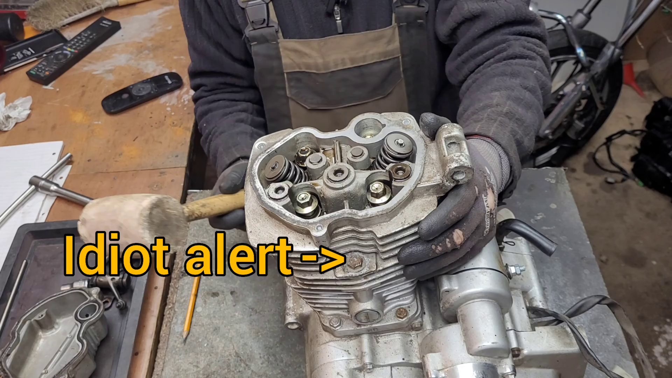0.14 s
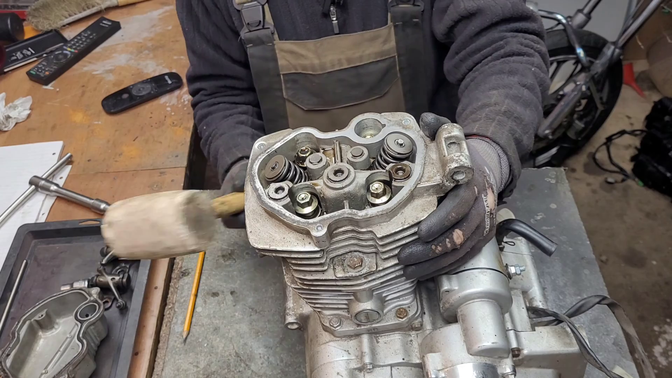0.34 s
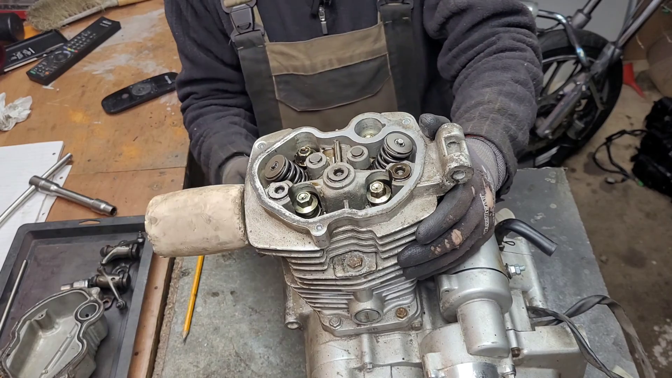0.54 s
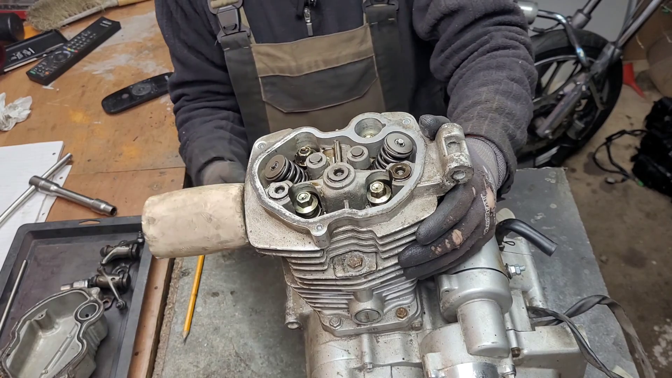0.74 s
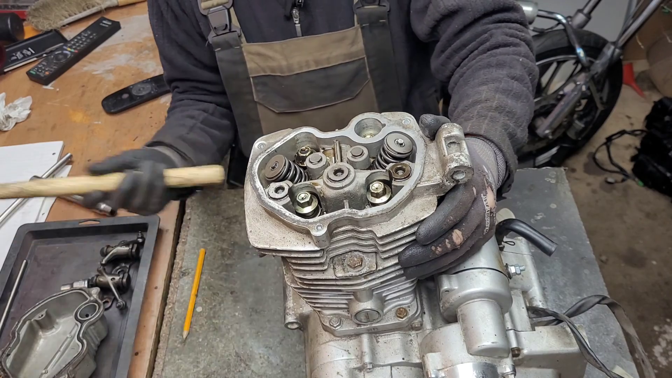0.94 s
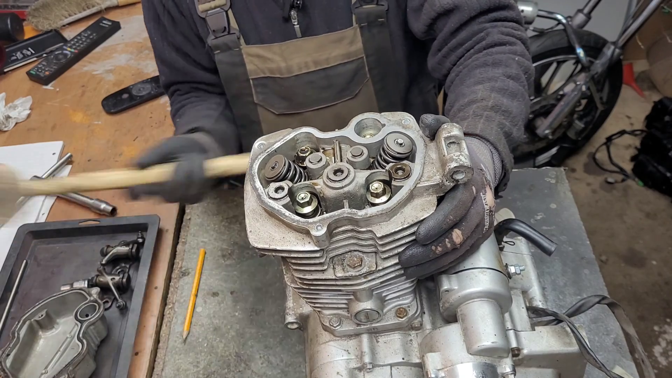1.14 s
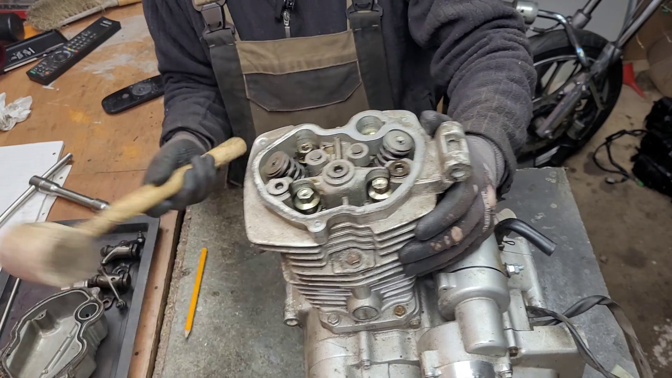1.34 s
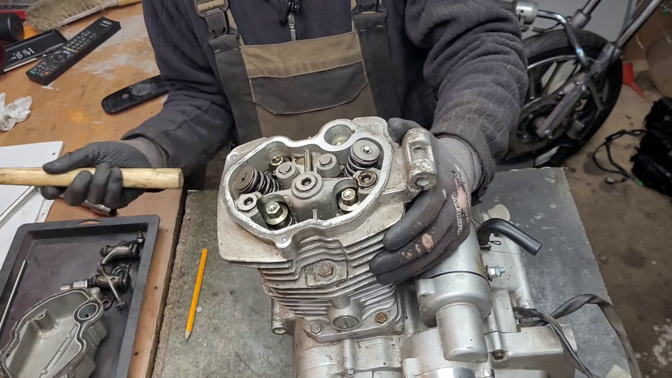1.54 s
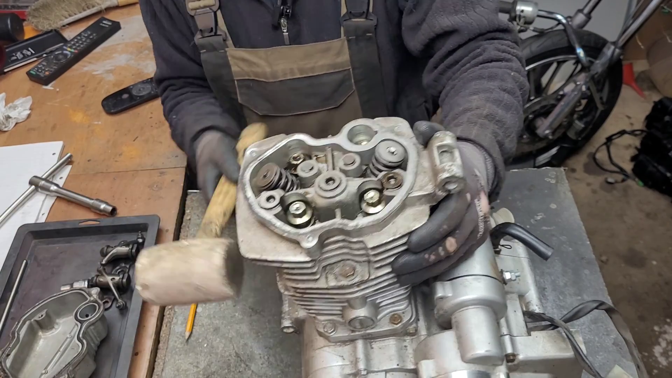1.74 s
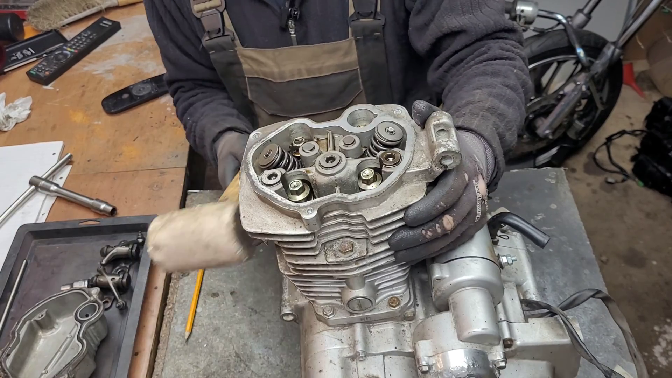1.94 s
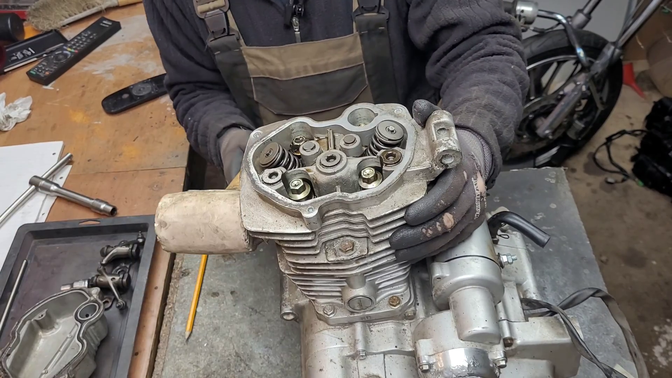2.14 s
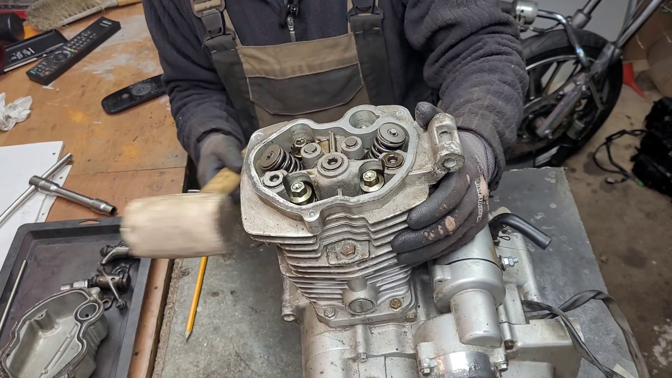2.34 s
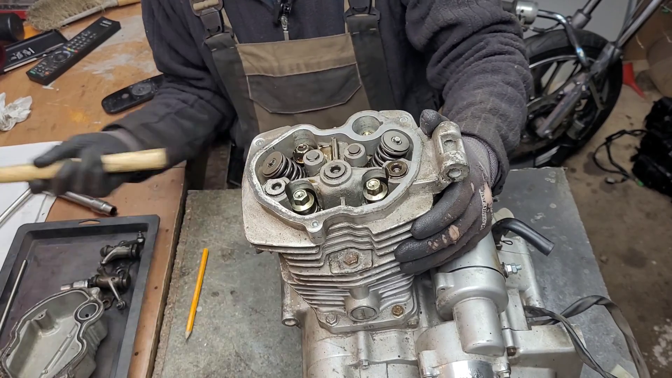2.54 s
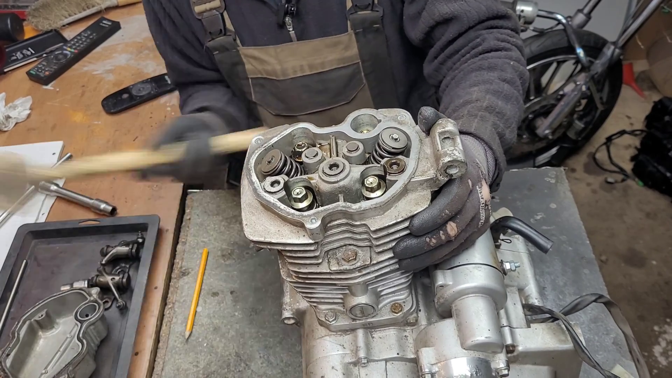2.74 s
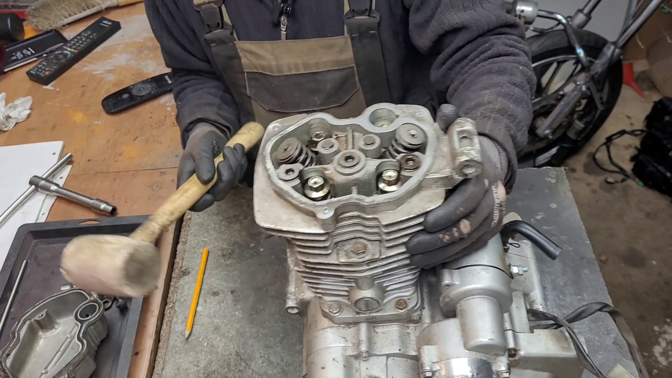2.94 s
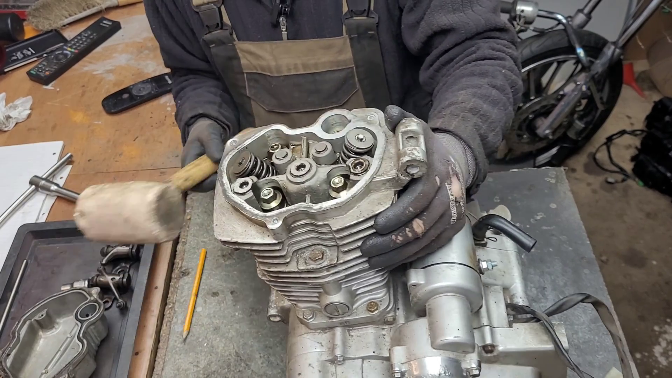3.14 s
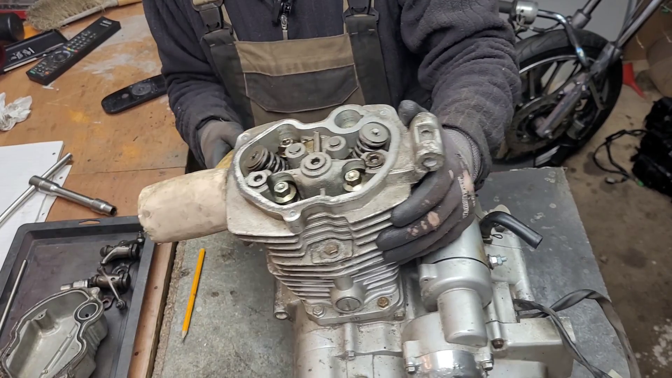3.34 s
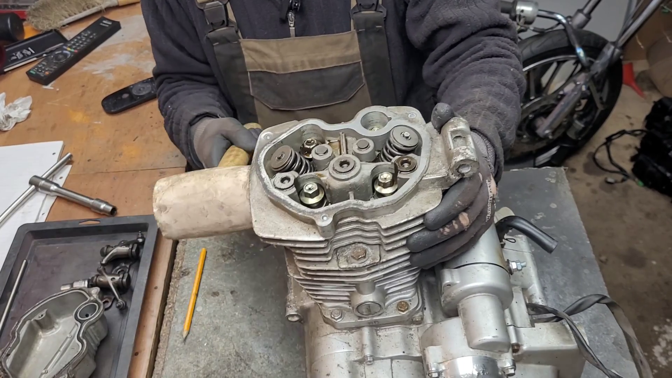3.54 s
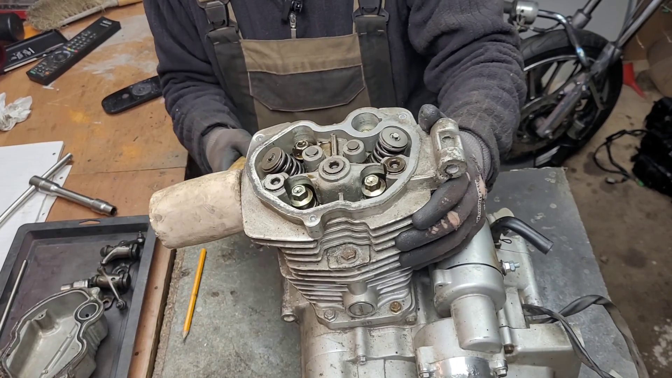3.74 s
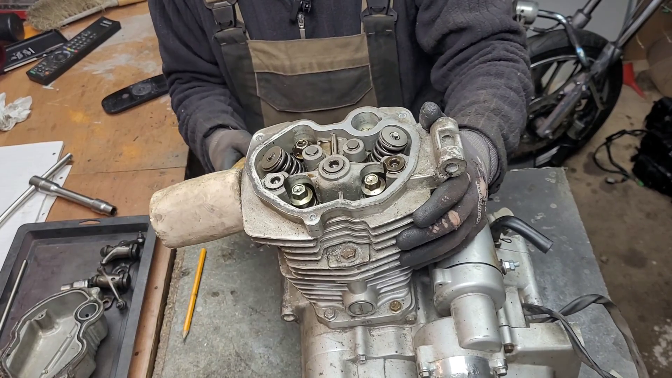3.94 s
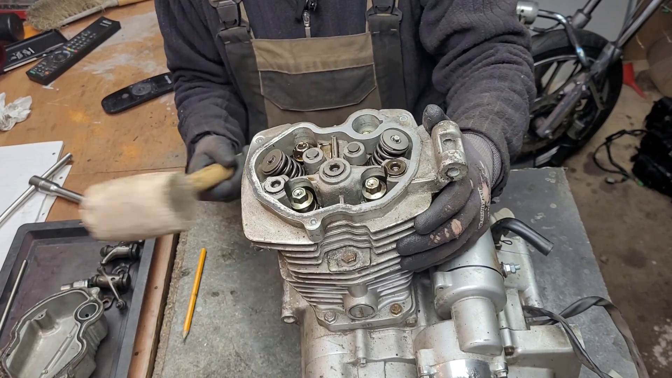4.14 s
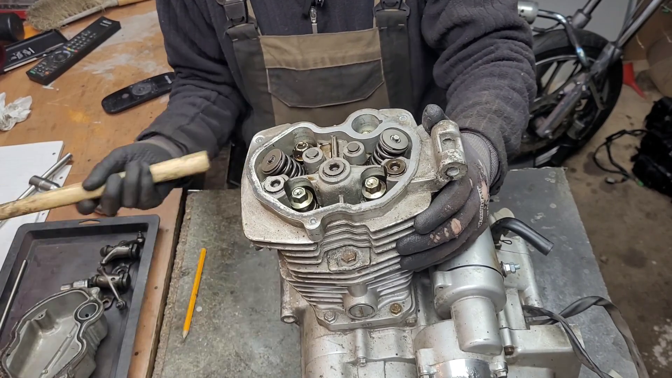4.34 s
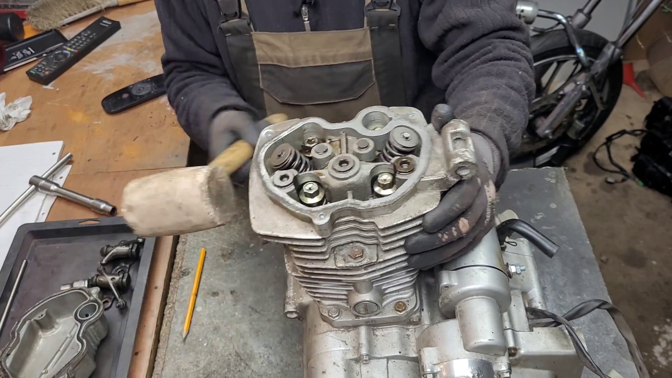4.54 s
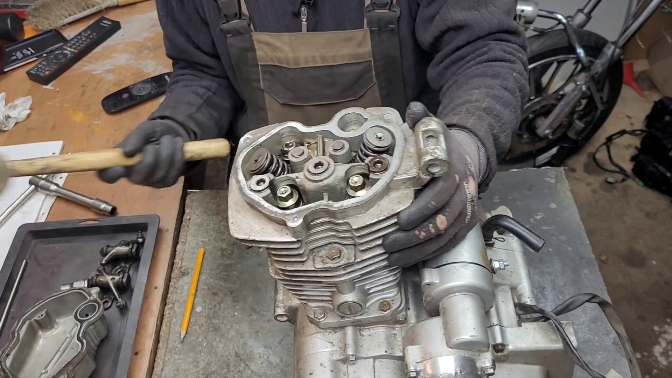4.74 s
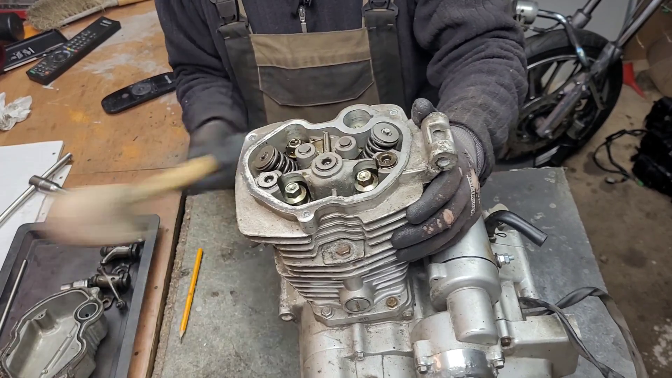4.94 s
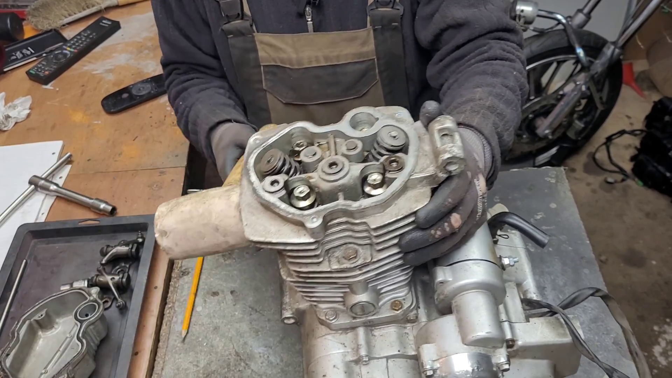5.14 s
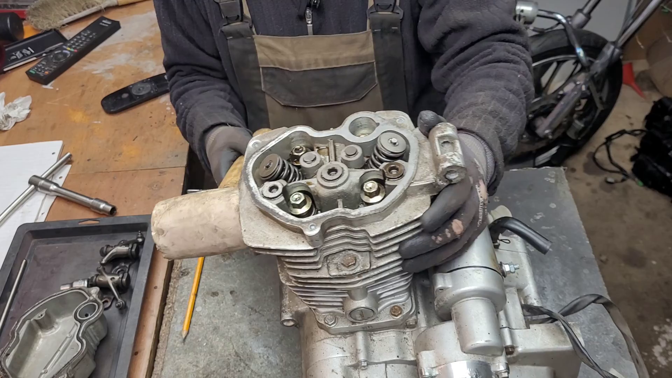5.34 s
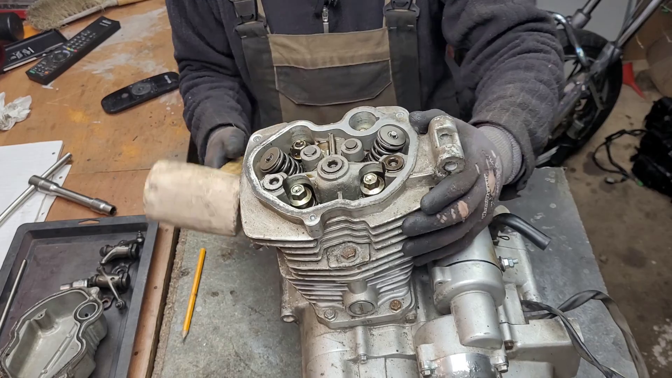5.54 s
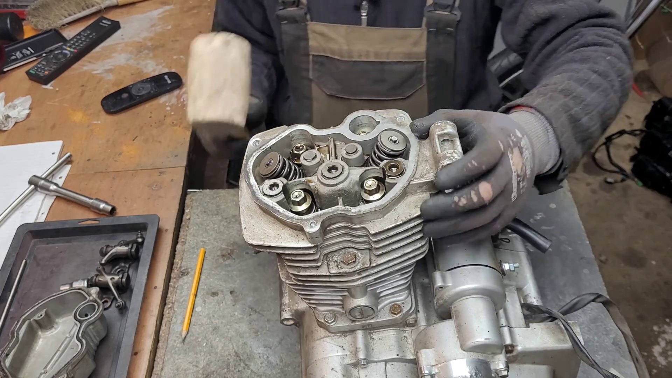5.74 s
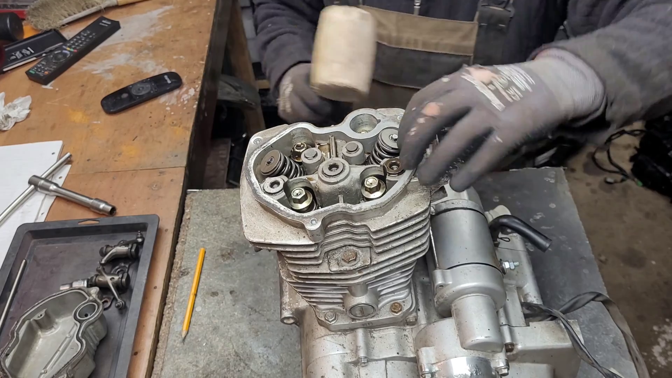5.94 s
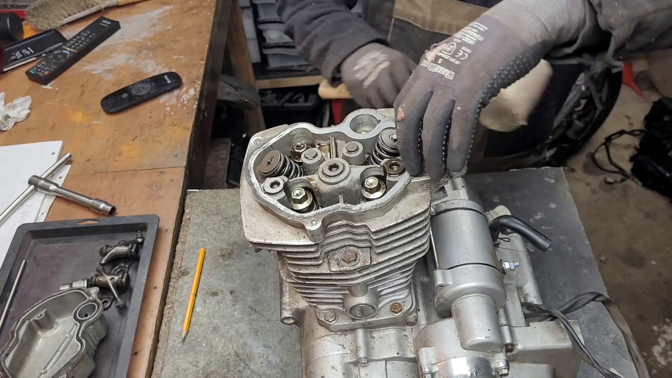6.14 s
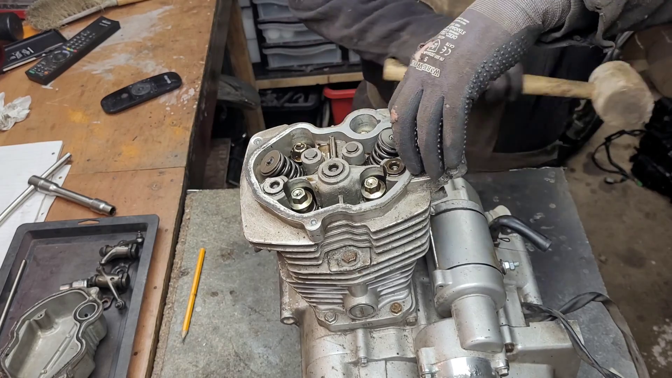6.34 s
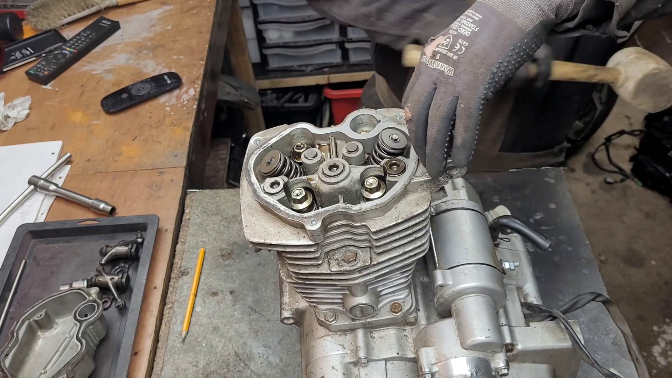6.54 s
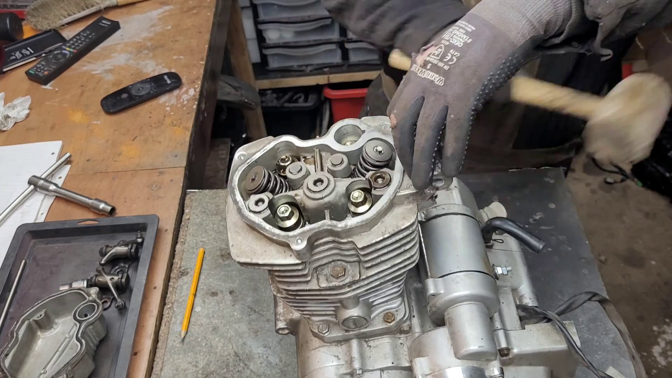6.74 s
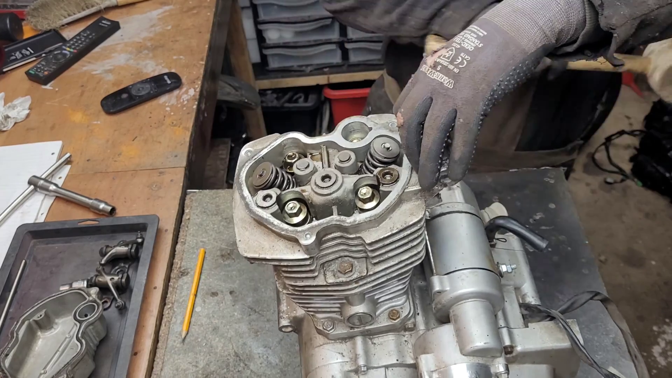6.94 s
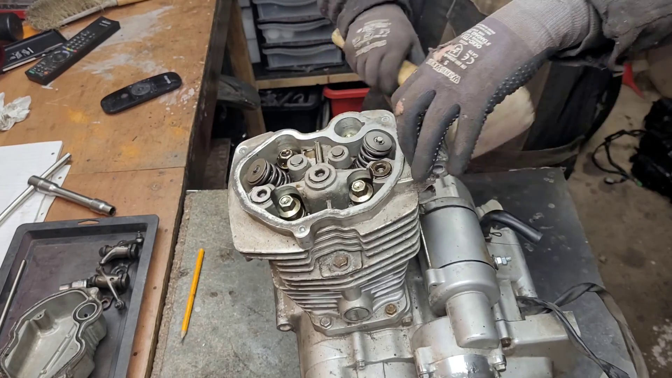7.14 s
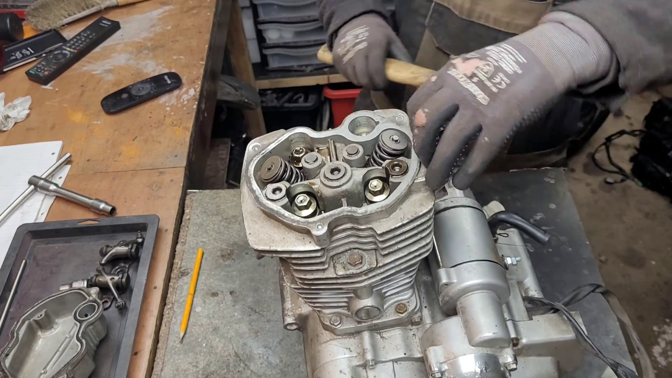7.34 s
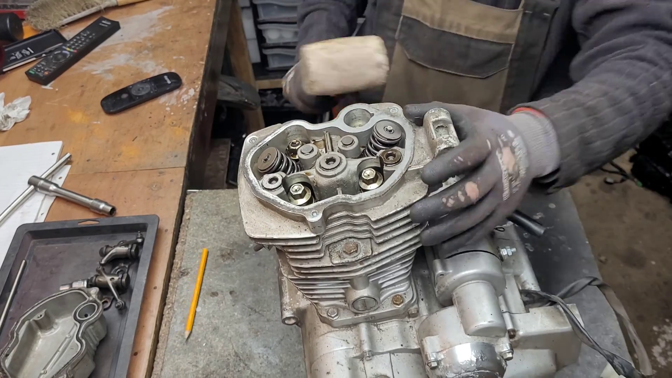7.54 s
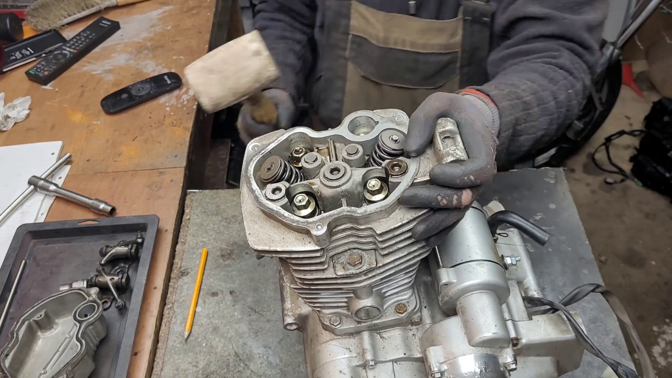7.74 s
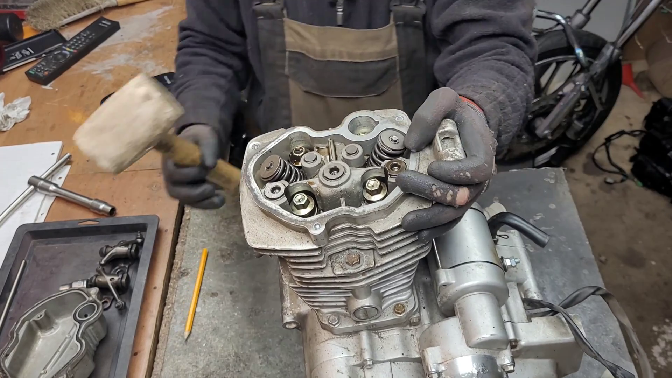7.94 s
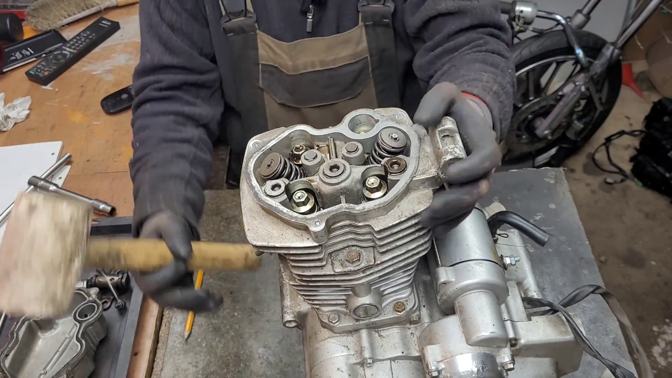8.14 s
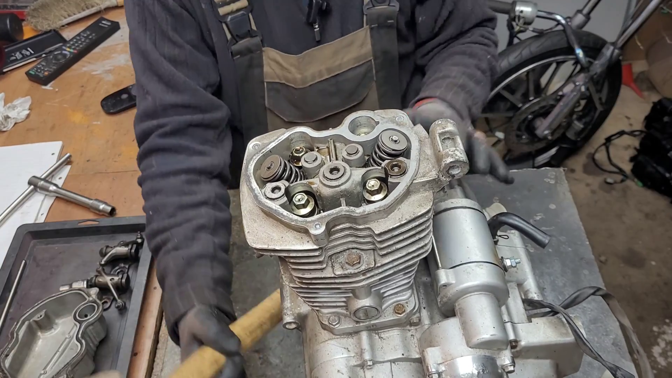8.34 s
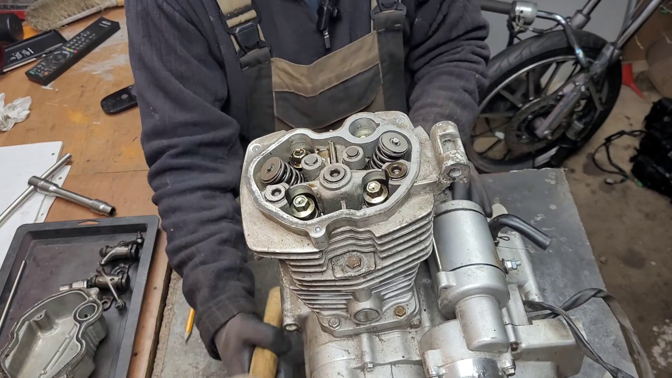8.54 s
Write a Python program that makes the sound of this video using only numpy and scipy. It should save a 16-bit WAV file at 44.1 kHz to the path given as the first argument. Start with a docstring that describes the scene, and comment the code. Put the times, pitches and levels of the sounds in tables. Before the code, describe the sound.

Near-centred close microphone, short room tail, faint still air and hum. Seven solid mallet hits on a small engine, unevenly spaced, with quick steel rattles and brief damped ringing. Light taps, clacks, tiny clinks and wooden bench knocks fill the gaps. After the fifth hit, fabric and gloves rustle; two deep hits with sharp snaps come late, then only scraping sleeves, hissing gloves and small bumps remain.

```python
"""A mallet knocks the aluminium cylinder head of a small engine loose, on a bench in a small workshop.
Each blow is a noise crack, a swelling sine thud and damped modes of the casting, with a rattle of the valve gear.
The engine rocks on the bench (dull knocks) and the head clacks, clinks and snaps (short rings and noise).
Sleeves and gloves rustle (coloured noise in strokes) over still air and a faint hum."""
import sys
import numpy as np
from scipy import signal
from scipy.fft import rfft, irfft, next_fast_len
from scipy.io import wavfile
from scipy.ndimage import uniform_filter1d

SR = 44100
rng = np.random.default_rng(int(sys.argv[2]) if len(sys.argv) > 2 else 0)


def file_out(sig):
    """Save sig as 16-bit WAV at sys.argv[1]."""
    # one column per channel
    cols = np.atleast_2d(sig).T
    # limit, then scale
    lim = np.clip(cols, -1, 1)
    pcm = np.round(lim * 32767).astype(np.int16)
    wavfile.write(sys.argv[1], SR, pcm)


N = 382788
TIME_S = np.arange(N) / SR
RING_S = np.arange(SR // 2) / SR  # time axis of one hit
START_S, TOP_HZ, FULL_SCALE = 0.349, 15800, 1.0


def undb(db):
    """Decibels to gain."""
    return 10 ** (np.asarray(db) / 20)


def unit(x):
    """Scale to rms 1."""
    return x / np.sqrt(np.mean(x ** 2))


def burst(x):
    """Scale a hit so that its loudest 5 ms have rms 1."""
    return x / np.sqrt(uniform_filter1d(x ** 2, size=220).max())


def decay(t60_s):
    """Exponential fall of 60 dB in t60_s."""
    return np.exp(-np.log(1000) * RING_S / t60_s)


def butter(x, order, hz, kind="low"):
    """Butterworth filter."""
    return signal.sosfilt(signal.butter(order, hz, kind, fs=SR, output="sos"), x)


def on_log(hz, rows):
    """Read the dB column of a table along log frequency."""
    rows = np.array(rows)
    return np.interp(np.log(hz + 1), np.log(rows[:, 0]), rows[:, 1])


def colour(x, rows):
    """Filter by a (frequency [Hz], level [dB]) outline."""
    size = next_fast_len(len(x))
    hz = np.arange(size // 2 + 1) * SR / size
    return irfft(rfft(x, size) * undb(on_log(hz, rows)), size)[:len(x)]


def add(track, s, sound):
    """Mix a sound in at time s."""
    i = max(int(s * SR), 0)
    track[i:i + len(sound)] += sound[:N - i]


def walk(step_hz):
    """Slow smoothed chance with a spread near 1."""
    k = int(SR / step_hz)
    steps = np.repeat(rng.standard_normal(N // k + 1), k)
    return unit(uniform_filter1d(steps, k)[:N])


def chatter(depth_db, size=110):
    """Parts that barely touch buzz against each other: a random gain that changes within milliseconds."""
    return undb(depth_db * unit(uniform_filter1d(rng.standard_normal(len(RING_S)), size)))


def swell(s, rise_s, fall_db_s):
    """An envelope that grows from time s, then loses so many dB a second."""
    age_s = TIME_S - s
    return np.clip(age_s / rise_s, 0, 1) * undb(-fall_db_s * np.maximum(age_s - rise_s, 0))


def wash(rows):
    """Countless weak modes: noise whose every band dies at its own rate."""
    hz = np.arange(len(RING_S) // 2 + 1) * SR / len(RING_S)
    noise = rfft(rng.standard_normal(len(RING_S))) * undb(on_log(hz, rows))
    centres_hz, _, t60s = np.transpose(rows)
    out = 0
    for pick, t60_s in zip(np.eye(len(rows)), t60s):
        share = np.interp(np.log(hz + 1), np.log(centres_hz), pick)
        out = out + irfft(noise * share, len(RING_S)) * decay(t60_s)
    return burst(out)


def modes(rows, scatter_db, detune):
    """Damped sines; each contact point weights them differently."""
    hz, db, t60_s = np.transpose(rows)[:, :, None]
    weight, shift, side = rng.standard_normal((3, len(rows), 1))
    waves = np.sign(side) * np.sin(2 * np.pi * hz * (1 + detune * shift) * RING_S)
    return burst(np.sum(undb(db + scatter_db * weight) * waves * decay(t60_s), axis=0))


def thud(hz, cycles):
    """The push of a contact: a swing that swells for some cycles and is soon gone."""
    age = RING_S * hz / cycles
    return burst(np.sin(2 * np.pi * hz * RING_S) * age ** 2 * np.exp(-2 * age))


def harden(x, db, corner_hz):
    """Contact hardness: gain above the corner, up for a hard contact, down for a soft one."""
    return butter(x, 2, corner_hz) - undb(db) * butter(x, 2, corner_hz, "high")


# spectrum of still air: (frequency [Hz], density [dB per Hz])
AIR_SPECTRUM = [(18, -45.5), (30, -16.5), (219, -9.5), (332, -7), (561, -9.5), (787, -1), (921, -6.5),
                (1590, -10.5), (2070, -15), (2360, -13.5), (7080, -16), (11600, -22), (15500, -15)]
# partials of the hum: (frequency [Hz], level [dB])
HUM_PARTIALS = [(801, -74), (1600, -77.5), (2401, -79)]


def workshop(air_db=-60.5):
    """Still air as coloured noise, and a faint hum of sines wavering in pitch and level."""
    air = unit(colour(rng.standard_normal(N), AIR_SPECTRUM)) * undb(air_db + 0.33 * walk(6.3))
    turns = np.cumsum(1 + .004 * walk(40)) / SR
    hum = 0
    for hz, db in HUM_PARTIALS:
        hum = hum + np.sqrt(2) * undb(db + 2 * walk(9.8)) * np.sin(2 * np.pi * hz * turns)
    return air + hum


# room decay: (frequency [Hz], level [dB per Hz], t60 [s])
ROOM_WASH = [(30, -15.5, .6), (64.6, 1.5, 0.44), (250, -0.5, 0.51), (480, -9.5, 0.44), (1000, 1.5, 0.26),
             (4000, -14.5, 0.39), (15000, -13.5, 0.52)]


def room(hits):
    """Short room tail: hits convolved with decaying noise."""
    walls = wash(ROOM_WASH)
    return signal.fftconvolve(hits, walls / np.linalg.norm(walls))[:N]


# fleece spectrum: (frequency [Hz], density [dB per Hz])
SLEEVE_SPECTRUM = [(24, -41.5), (40, -15), (64, -8.5), (108, -23), (253, -5), (350, -8.5), (427, -2.5),
                   (758, -11), (1080, -7), (1220, -9.5), (2220, -13.5), (3650, -16), (7910, -17.5),
                   (11200, -37), (15500, -16)]
# low while the arms only swing, higher once the hands change grip: (time [s], level [dB])
SLEEVE_LEVEL_DB = [(0.4, -77), (1.1, -67), (2.25, -80), (4.1, -63.5), (5.35, -73), (5.6, -54), (6.12, -60),
                   (6.45, -53), (7.1, -55), (7.38, -51.5), (7.68, -66), (7.92, -48.5), (8.12, -58),
                   (8.68, -54.5)]
JOLT_DB, JOLT_RISE_S, JOLT_FALL_DB_S = -54.5, 0.033, 67  # JOLT_DB: relative to the blow


def sleeves(grain_db=4, flicker_db=1):
    """Fleece rubs in many tiny catches of fibres, as the arms move and after the jolt of each blow."""
    moving = undb(np.interp(TIME_S, *np.transpose(SLEEVE_LEVEL_DB)))
    jolts = sum(undb(db + JOLT_DB) * swell(s, JOLT_RISE_S, JOLT_FALL_DB_S) for s, db, *_ in MALLET_BLOWS)
    fibres = rng.standard_normal(N) * undb(grain_db * walk(900))
    return unit(colour(fibres, SLEEVE_SPECTRUM)) * np.hypot(moving, jolts) * undb(flicker_db * walk(17))


# a sleeve drags across the bib of the overalls: (time [s], relative level [dB], centre [Hz])
SLEEVE_DRAG = [(7.76, -61, 1650), (7.844, -51.5, 1920), (7.908, -55, 1370), (8.0, -57, 1720),
               (8.316, -52, 1310), (8.49, -56.5, 1390), (8.68, -51, 1890)]


def drag(width_oct=0.38, grain_db=4):
    """Cloth sliding on cloth: a grainy noise rasp, its bands weighted around a moving centre."""
    s, db, hz = np.transpose(SLEEVE_DRAG)
    centre_hz = np.interp(TIME_S, s, hz)
    fibres = rng.standard_normal(N) * undb(grain_db * walk(500))
    out = 0
    for band_hz in np.geomspace(900, 3600, num=7):
        band = butter(fibres, 2, [band_hz / 1.2, band_hz * 1.13], "band")
        out = out + unit(band) * np.exp(-(np.log2(band_hz / centre_hz) / width_oct) ** 2)
    return unit(out) * undb(np.interp(TIME_S, s, db, left=-120) - 3.0)


# hiss of the glove coating: (frequency [Hz], density [dB per Hz])
GLOVE_SPECTRUM = [(5000, -30), (7300, -1.5), (8100, -2), (9200, -16.5), (12000, -15), (16000, -9.5)]
# the casting under a glove: (frequency [Hz], density [dB per Hz])
RUB_SPECTRUM = [(150, -24), (280, -8.5), (400, 4.5), (520, -6), (740, -6), (1000, -10), (2000, -33),
                (15000, -60.5)]
# strokes along the handle or over the casting:
# (peak time [s], hiss level [dB], low rub level [dB], rise [s], fall [s])
GLOVE_STROKES = [(1.22, -61, -79.5, 0.37, 0.12), (2.8, -53, -63, 0.07, 0.18), (5.62, -63, -85, .1, 0.75),
                 (6.34, -53, -64, 0.29, 0.24), (7.359, -46, -47, 0.063, .17), (7.679, -80, -52, 0.33, 0.35),
                 (8.17, -52.5, -70, 0.1, .14), (8.68, -49.5, -79, .12, .1)]
STROKE_DROP_DB = 13.5  # over one rise or fall time
RUB_CATCHES_PER_S = 49


def gloves(flicker_db=1, catch_db=4):
    """Coated gloves hiss in strokes that grow and fade; on the casting they stick and slip with a low rub."""
    hiss, rub = np.zeros(N), np.zeros(N)
    for s, hiss_db, rub_db, rise_s, fall_s in GLOVE_STROKES:
        stroke = undb(-STROKE_DROP_DB * np.maximum((s - TIME_S) / rise_s, (TIME_S - s) / fall_s))
        hiss += undb(hiss_db) * stroke
        rub += undb(rub_db) * stroke
    coating = unit(colour(rng.standard_normal(N), GLOVE_SPECTRUM)) * undb(flicker_db * walk(35))
    catches = rng.standard_normal(N) * undb(catch_db * walk(RUB_CATCHES_PER_S))
    return hiss * coating + rub * unit(colour(catches, RUB_SPECTRUM))


# scuffs of the crankcase: (frequency [Hz], density [dB per Hz])
SHUFFLE_SPECTRUM = [(30, -29.5), (65, -4.5), (120, -8), (240, 0), (450, -3), (800, -10.5), (1500, -15),
                    (3000, -31.5), (15000, -48.5)]
SHUFFLE_DB, SHUFFLE_RISE_S, SHUFFLE_FALL_DB_S = -45, 0.17, 50.5  # SHUFFLE_DB: relative to the blow


def shuffling(grain_db=4):
    """After each blow the crankcase settles on the bench in small, dull scuffs of grainy noise."""
    scuffs = unit(colour(rng.standard_normal(N) * undb(grain_db * walk(60)), SHUFFLE_SPECTRUM))
    level = 0
    for s, db, *_ in MALLET_BLOWS:
        level = level + undb(db + SHUFFLE_DB) * swell(s, SHUFFLE_RISE_S, SHUFFLE_FALL_DB_S)
    return scuffs * level


# modes of the casting on its bench: (frequency [Hz], level [dB], t60 [s])
CASTING_MODES = [(67.45, -19.5, 0.41), (150, -18.5, 0.35), (210.4, -6, 0.16), (257, 1, .15),
                 (298.5, -1, 0.092), (356, -5.5, .14), (437, -2, 0.19), (501.7, 3.5, 0.12),
                 (565.7, 0.5, .11), (725, 2, 0.06), (978, -2, 0.15), (1142, -5.5, 0.087), (1333, -5, 0.11),
                 (1735, -13.5, 0.12), (2106, -12.5, 0.098), (2476, -12, 0.077)]
# its crowd of weaker modes: (frequency [Hz], density [dB per Hz], t60 [s])
CASTING_NOISE = [(25, -42.5, .3), (60, -28, 0.22), (143, -31, 0.38), (235, 3, 0.15), (520, -2.5, 0.12),
                 (749.7, -1, 0.12), (1220, -5.5, 0.12), (1900, -15.5, 0.19), (3400, -21.5, 0.16),
                 (6870, -27, 0.18), (9500, -44.5, 0.05), (15560, -39.5, .12)]


def casting(modes_db):
    """The ring of the finned aluminium head: chattering wash plus damped modes."""
    return burst(wash(CASTING_NOISE) * chatter(3.5) + undb(modes_db) * modes(CASTING_MODES, 4, 0.0069))


# modes of the valve gear: (frequency [Hz], level [dB], t60 [s])
STEEL_MODES = [(2610, -12, .13), (3070, -17, .18), (4330, -19, .13), (4576, -17, .17), (4845, -19, .15),
               (5000, -16, .14), (5215, -11.5, .12), (6255, -6, .13), (6400, -13.5, .13), (6908, -8, .14),
               (7260, -2, .11), (7370, 1, .096), (7590, -6.5, .13), (8565, -24.5, .16), (11300, -16, .08),
               (11700, -19.5, .13), (13970, -13.5, .1), (14210, -10, .09), (14400, -17, .12)]
# its crowd of weaker modes: (frequency [Hz], density [dB per Hz], t60 [s])
STEEL_NOISE = [(500, -32, 0.12), (2000, -4, .15), (3750, -15, 0.43), (6000, -6.5, 0.14), (6550, 5.5, 0.13),
               (8880, -13.5, 0.16), (12100, -10.5, 0.13), (14700, -4, 0.17), (16130, -9.5, 0.059)]


def steel(modes_db):
    """The ring of valve springs and retainers: chattering wash plus damped modes."""
    return burst(wash(STEEL_NOISE) * chatter(3) + undb(modes_db) * modes(STEEL_MODES, 3, .004))


# thin cooling fins sing on after a contact: (frequency [Hz], level [dB], t60 [s])
FIN_MODES = [(1866, -1.5, 0.31), (2310, -6, .25), (3110, -8.5, 0.1), (3880, 2, 0.11)]
# weak modes of a light tap: (frequency [Hz], density [dB per Hz], t60 [s])
TAP_NOISE = [(60, -13, 0.32), (277, -4, 0.17), (550, -1, 0.16), (1000, -6.5, 0.19), (2320, -7, 0.11),
             (3400, -18, 0.14), (7100, -21.5, 0.22), (9500, -42, 0.14), (15000, -28, 0.29)]
# the mallet and its handle bump the casting lightly:
# (time [s], relative level [dB], pitch [Hz], relative brightness [dB], fin ring [dB])
LIGHT_TAPS = [(0.492, -23, 285, -7.5, -24), (1.989, -30.5, 576, -5, -19), (2.015, -27, 756, -24, -10),
              (2.09, -38.5, 520, -12, -18), (2.128, -30.5, 800, -20, -23), (3.301, -18, 332, -23, -13.5),
              (5.903, -23, 310, -7.5, -18), (5.961, -18, 445, -21, -30), (5.981, -25.5, 444, -22.5, -22),
              (6.347, -39.5, 383, -24, -22), (7.178, -17.5, 495, -28, -28), (8.28, -31.5, 336, -11, -13),
              (8.419, -27.5, 780, -20, -24)]


def taps():
    """Light bumps: wash, casting and fin modes, plus a thud."""
    out = np.zeros(N)
    for s, db, hz, bright_db, fins_db in LIGHT_TAPS:
        body = wash(TAP_NOISE) + undb(-4.5) * modes(CASTING_MODES, 4.1, 0.01)
        body += undb(fins_db) * modes(FIN_MODES, 2.8, 0.0073)
        tap = harden(body, bright_db + 15.0, 630) + undb(1.5) * thud(hz, 1.8)
        add(out, s, undb(db - 8.0) * burst(tap))
    return out


# weak modes of the bench: (frequency [Hz], density [dB per Hz], t60 [s])
BENCH_NOISE = [(25, -37, .4), (60, -9.5, 0.52), (105, -11, 0.28), (221.4, 2, 0.24), (406, -4, 0.25),
               (746, -16.5, 0.39), (1496, -17.5, 0.29), (3010, -28, 0.34), (7060, -28.5, 0.6),
               (10000, -43, 0.088), (15000, -45.5, .12)]
# the engine rocks on the bench: (time [s], relative level [dB], pitch [Hz], relative brightness [dB])
BENCH_KNOCKS = [(0.49, -21, 302, -33), (0.541, -25, 340, -16), (1.404, -16.5, 251, -28),
                (1.924, -26.5, 189, -13), (3.046, -19, 369, -36), (3.456, -17.5, 284, -27),
                (3.59, -31.5, 223, -28), (3.654, -23.5, 219, -26), (3.868, -36, 229, -8),
                (4.73, -18.5, 211, -28), (5.19, -20, 209, -23), (5.392, -30, 219, -22),
                (5.506, -32.5, 228.4, -13.5), (6.822, -24.5, 224, -10), (7.075, -30.5, 251, -14),
                (7.295, -23, 251, -26), (8.276, -38, 203, 1)]
TOTTER_S, TOTTER_RATIO, TOTTER_STEP_DB = 0.037, .8, -10  # nominal first gap, gap ratio, level step


def rocking(totters=2):
    """Dull knocks of the heavy engine on its wooden bench, each followed by weaker, quickening totters."""
    out = np.zeros(N)
    for s, db, hz, bright_db in BENCH_KNOCKS:
        body = wash(BENCH_NOISE) * chatter(1.3) + undb(-13.0) * modes(CASTING_MODES, 3, .008)
        knock = burst(harden(body, bright_db + 9.5, 1000) + thud(hz, 1.56))
        add(out, s, undb(db - 6.0) * knock)
        for k in range(totters):
            s = s + TOTTER_S * TOTTER_RATIO ** k * rng.uniform(.75, 1.1)
            add(out, s, undb(db - 5.5 + TOTTER_STEP_DB * (k + 1)) * knock)
    return out


# the head drops back on the barrel: (time [s], relative level [dB], steel brightness [dB])
HEAD_CLACKS = [(1.334, -16.5, -11), (1.452, -17.5, -25), (1.954, -21.5, -35), (3.082, -26.5, -31),
               (3.696, -18.5, -30), (4.752, -25.5, -30), (7.576, -36, -4)]


def clacks():
    """Thinned casting ring with a little steel ring and crack noise."""
    out = np.zeros(N)
    for s, db, bright_db in HEAD_CLACKS:
        clack = burst(butter(casting(-6), 1, 900, "high"))
        clack += undb(bright_db) * steel(-2) * np.exp(-RING_S / .08)
        clack += undb(-10.0) * wash(CRACK_NOISE)
        add(out, s, undb(db - 7) * burst(clack))
    return out


# loose steel parts of the valve gear clink: (time [s], relative level [dB], own pitch [Hz])
STEEL_CLINKS = [(1.8706, -22.5, 7260), (1.891, -28.5, 7550), (2.9009, -14.5, 6310), (2.9201, -17.5, 6180),
                (3.1235, -36.5, 7500), (3.689, -24.5, 7330), (4.811, -36.5, 7640), (5.1186, -27.5, 4930),
                (5.244, -19, 4980), (5.2544, -36, 14000), (5.2674, -26, 7340), (8.445, -38, 5310)]


def clinks(t60_s=0.057):
    """Each part sounds its own damped sine over the ring of the rest."""
    out = np.zeros(N)
    for s, db, hz in STEEL_CLINKS:
        own = np.sin(2 * np.pi * hz * RING_S) * decay(t60_s)
        ring = steel(0) * np.exp(-RING_S / 0.029)
        add(out, s, undb(db - 9.0) * burst(ring + own))
    return out


# the head binds and slips: (time [s], relative level [dB], pitch [Hz])
HEAD_SNAPS = [(6.4313, -26.5, 9000), (6.6714, -12, 5400), (6.7363, -4, 6100), (7.1605, -7, 6500),
              (7.1907, -11.5, 10400), (7.786, -34.5, 4100)]


def snaps():
    """Dry snaps too short to ring: band-passed noise decaying in milliseconds."""
    out = np.zeros(N)
    for s, db, hz in HEAD_SNAPS:
        crack = rng.standard_normal(len(RING_S)) * np.exp(-RING_S / 0.0016)
        band = butter(crack, 2, [hz * 0.5, min(hz * 1.3, TOP_HZ)], "band")
        add(out, s, undb(db - 10.5) * burst(band + undb(-12.5) * crack))
    return out


def rattle(delay_s, count=8):
    """Loose parts are thrown up by a blow and land in a quick cluster, each favouring its own pitch."""
    out = np.zeros(len(RING_S))
    ring = steel(-3.5) * np.exp(-RING_S / .06)
    landings_s = delay_s * np.linspace(.3, 2.1, count) * rng.uniform(0.78, 1.15, count)
    for i, (hz, _, _) in zip((landings_s * SR).astype(int), rng.permutation(STEEL_MODES)):
        part = ring + undb(11) * butter(ring * chatter(0.79), 1, [hz / 1.05, hz * 1.05], "band")
        out[i:] += undb(3 * rng.standard_normal()) * part[:len(RING_S) - i]
    return burst(out)


# crack of the mallet face: (frequency [Hz], density [dB per Hz], t60 [s])
CRACK_NOISE = [(200, -24, 0.033), (1100, 7, 0.061), (2400, -2, 0.068), (3080, -7.5, 0.019),
               (4350, -3, 0.057), (7470, -8, 0.05), (9300, -39, 0.056), (14900, -6.5, 0.06)]
# mallet blows: (time [s], level [dB], thud pitch [Hz], relative thud [dB], relative rattle [dB],
# rattle delay scale [s], rebound [dB])
MALLET_BLOWS = [(1.252, -3, 492, -8, -7.5, 0.013, -10), (1.753, 0, 501, -4, -9, 0.013, -21),
                (2.842, -3, 453, -10.5, -4.5, 0.011, -11), (4.5758, -3, 455, -8, -4.5, 0.01, -11),
                (5.03, -2, 283, -2, -7, 0.013, -13), (6.6986, -2, 508, 2, -8, 0.011, -15.5),
                (7.1139, -1.5, 504, 1.5, -9, 0.0115, -20)]


def mallet(rebound_s=.021, cycles=1.15, rock_hz=212):
    """Crack, thud and ring; the valve gear rattles and the lifted head strikes its studs just after."""
    out = np.zeros(N)
    for s, db, hz, thud_db, rattle_db, delay_s, rebound_db in MALLET_BLOWS:
        # a dead blow puts its energy into the thud and rocks the whole engine, a lively one into the crack
        crack = wash(CRACK_NOISE) * chatter(4.3) + undb(-20.5) * modes(FIN_MODES, 4.5, 0.011)
        crack *= undb(-15.5 - 0.71 * thud_db)
        swing = undb(thud_db - 7.0) * (thud(hz, cycles) + undb(-14) * thud(rock_hz, 2.3))
        add(out, s + .001, undb(db) * (crack + undb(-9.5) * casting(2.5)))
        add(out, s + 0.0021, undb(db) * swing)
        add(out, s, undb(db + rattle_db - 10.0) * rattle(delay_s))
        add(out, s + rebound_s, undb(db + rebound_db) * casting(-0.93))
    return out


# share of the sound that leans right: (frequency [Hz], level [dB])
RIGHT_LEAN = [(60, -31.5), (300, -40), (600, -48), (2500, -47.5), (4000, -61), (15000, -47)]


def scene(room_db=-25, air_pan_db=-1.0):
    """Close sounds with a short room tail, almost the same in both ears."""
    hits = mallet() + rocking() + taps() + clacks() + clinks() + snaps()
    cloth = sleeves() + gloves() + drag()
    mid = hits + undb(room_db) * room(hits) + shuffling() + cloth
    sides = np.array([[1], [-1]])  # left, right
    return mid - sides * colour(mid, RIGHT_LEAN) + workshop() * undb(sides * air_pan_db / 2)


def record(dry, low_cut_hz=48):
    """Silence until START_S, a 20 ms fade-in, rounded peaks, then rumble and top cut."""
    opened = dry * np.clip((TIME_S - START_S) / 0.02, 0, 1)
    rounded = opened / (1 + (opened / FULL_SCALE) ** 4) ** (1 / 4)
    lean = butter(rounded, 3, low_cut_hz, "high")
    return signal.sosfilt(signal.ellip(10, .2, 70, TOP_HZ, fs=SR, output="sos"), lean)


dry = scene()
out = record(dry)
file_out(out)
```